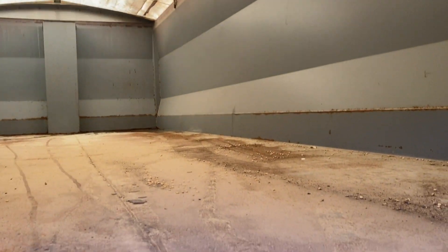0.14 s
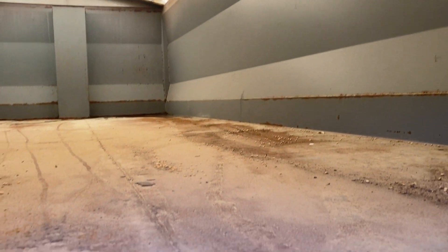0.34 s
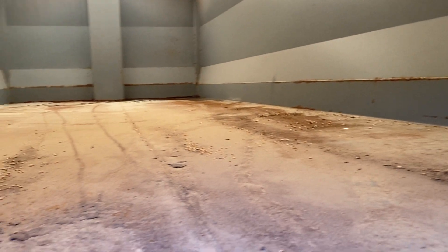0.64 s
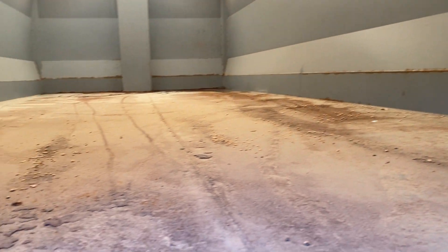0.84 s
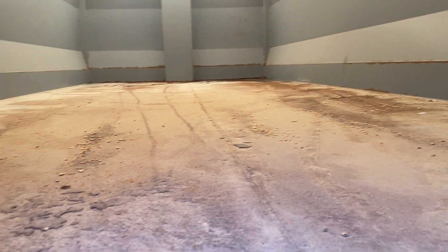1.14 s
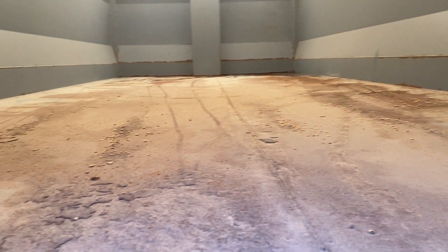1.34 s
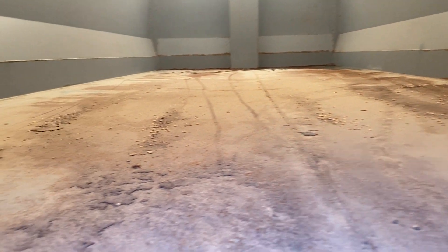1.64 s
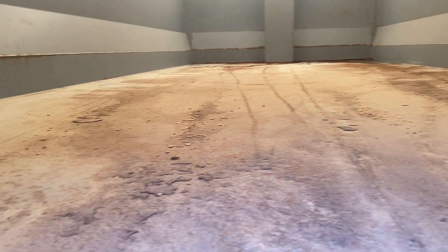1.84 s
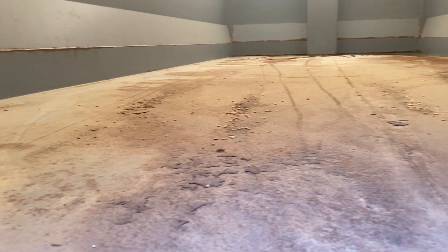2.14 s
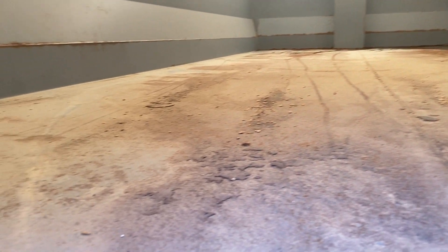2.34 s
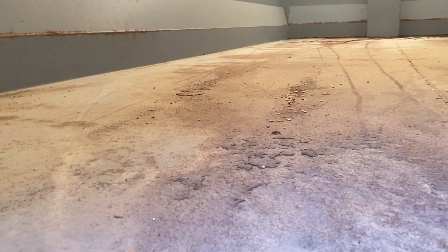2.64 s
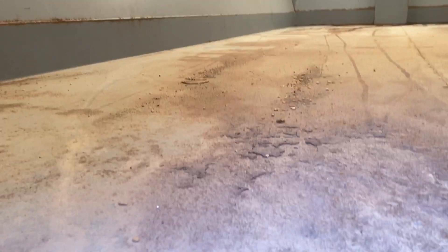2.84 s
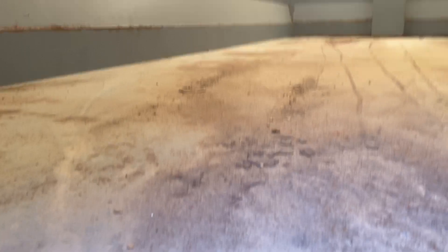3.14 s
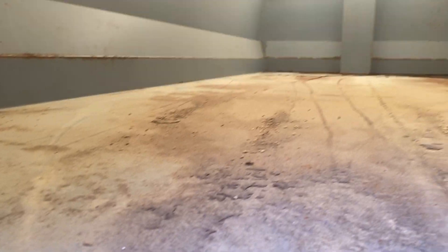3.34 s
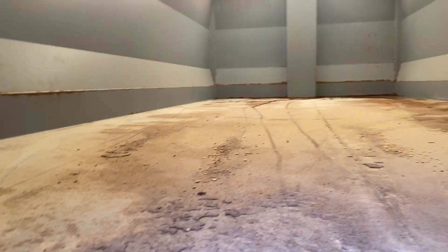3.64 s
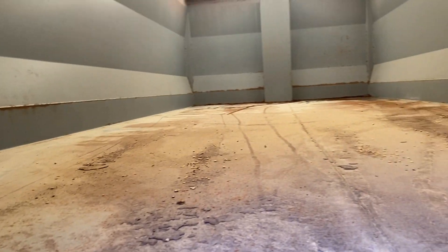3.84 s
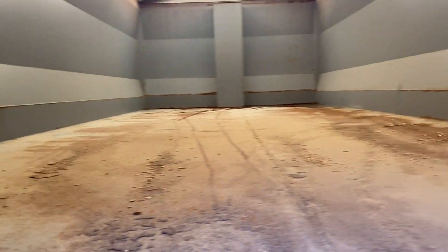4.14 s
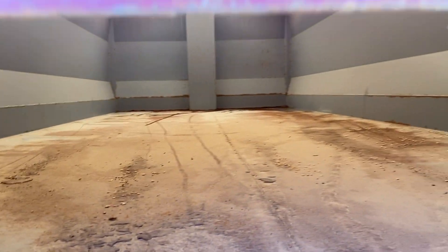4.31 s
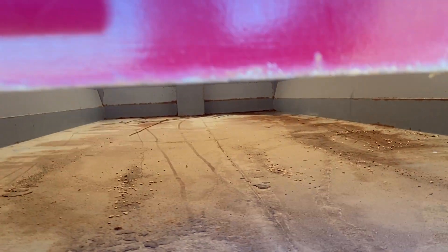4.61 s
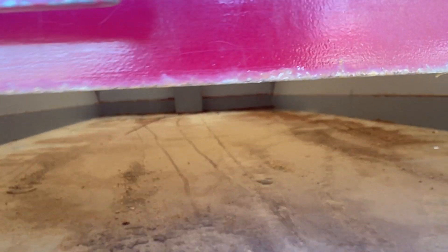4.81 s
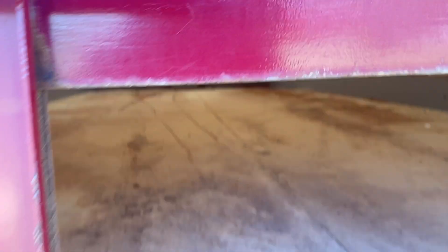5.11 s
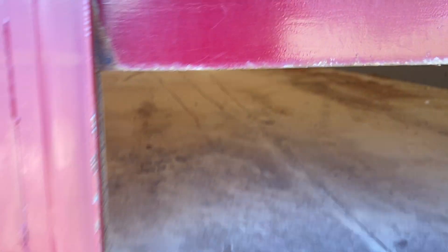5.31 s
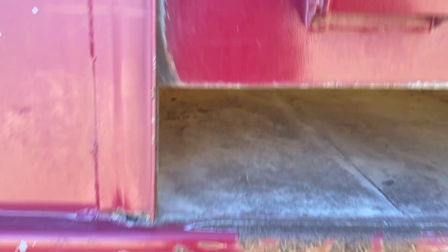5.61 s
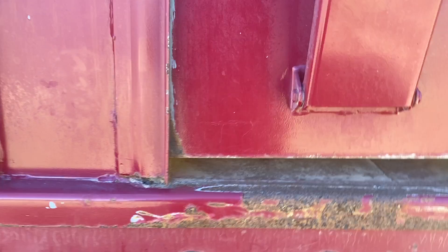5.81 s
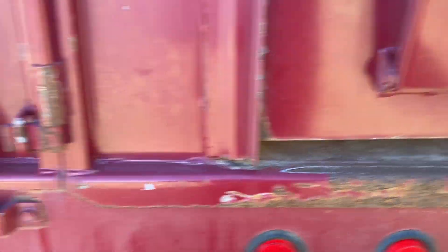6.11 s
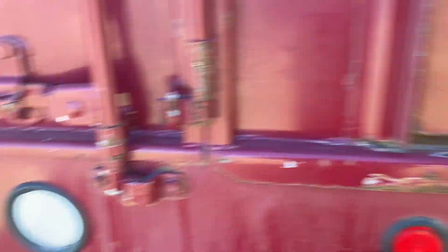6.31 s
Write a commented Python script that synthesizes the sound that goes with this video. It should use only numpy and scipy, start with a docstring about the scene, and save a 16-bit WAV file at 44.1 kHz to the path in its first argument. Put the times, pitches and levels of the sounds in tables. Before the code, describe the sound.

A large diesel truck idles from start to finish, about six and a half seconds, heard at the open rear door of its empty steel trailer. The sound is a deep, throbbing hum with a hollow exhaust boom and light engine clatter. Its humming tones swell and dip as the listener moves. Loose panels knock faintly at about 2 seconds, several times between 3 and 4, and again at 5.3. At about 5 seconds a tiny click opens a soft, steady hiss of air, and the boom eases as the listener steps back. Around 5.8 seconds the air flares into one sharp, loud, roaring burst with crisp clicks, then shuts off and rings briefly in the trailer. A second, shorter hiss with a click comes at about 6.4 seconds, over the continuing idle.

```python
"""A deep, throbbing hum comes first: a six-cylinder diesel truck idles, heard at the open rear door
of its empty steel tipper trailer. The exhaust makes the trailer boom, the engine clatters, belt-driven
parts hum and loose panels knock. The listener moves through loud and quiet spots, then steps back.
Near the end an air jet opens with a click, sweeps onto a steel corner in one sharp burst,
rings out in the trailer and opens again."""
import sys
import numpy as np
from scipy import signal
from scipy.fft import rfft, irfft, next_fast_len
from scipy.io import wavfile
from scipy.ndimage import uniform_filter1d, minimum_filter1d, map_coordinates

SR = 44100
rng = np.random.default_rng(int(sys.argv[2]) if len(sys.argv) > 2 else 0)


def pcm_store(signal):
    """Save signal as 16-bit PCM."""
    levels = np.round(np.clip(np.atleast_2d(signal), -1, 1) * 32767)
    wavfile.write(sys.argv[1], SR, levels.astype(np.int16).T)


N = 284886
TIME = np.arange(N) / SR
OPPOSITE = np.array([[1], [-1]])  # plus on the left, minus on the right


def amp(db):
    """Turn decibels into a gain to multiply by."""
    return 10 ** (np.asarray(db) / 20)


def unit(x):
    """Scale x to an average power of 1."""
    return x / np.sqrt(np.mean(x ** 2) + 1e-20)


def along(points, hz):
    """Read a (frequency, value) table, giving each octave equal room."""
    f, values = np.transpose(points)
    return np.interp(np.log(hz + 1), np.log(f + 1), values)


def over_time(points):
    """Read a (time, value) table at every sample."""
    return np.interp(TIME, *np.transpose(points))


def wobble(rate):
    """A smooth curve through `rate` random values a second."""
    grid = np.arange(0, N * rate / SR + 1, 1 / 10)
    smooth = map_coordinates(rng.standard_normal(int(N * rate / SR) + 4), [grid])
    return np.interp(TIME * rate, grid, smooth)


def filtered(x, response):
    """Multiply each frequency in x by response(hz)."""
    size = next_fast_len(N + SR // 8, real=True)
    return irfft(rfft(x, size) * response(np.fft.rfftfreq(size, 1 / SR)), size)[..., :N]


def coloured(x, spectrum):
    """Shape x with a (frequency, level) table, then scale it to power 1."""
    return unit(filtered(x, lambda hz: amp(along(spectrum, hz))))


def stereo_noise(likeness):
    """White noise that is partly the same in both ears."""
    def split(hz):
        angle = np.arccos(np.clip(along(likeness, hz), -1, 1)) / 2
        return np.array([np.cos(angle), np.sin(angle)])
    mid, side = filtered(rng.standard_normal((2, N)), split)
    return np.array([mid + side, mid - side])


def step(at_s, ease_s):
    """A smooth rise from 0 to 1 around a given time."""
    return .5 + .5 * np.tanh((TIME - at_s) / ease_s / 2)


def heard(db, fade_db_per_s, outside_loss_db):
    """Gain of an engine sound as the listener draws back slowly, then leaves the doorway."""
    return amp(db - fade_db_per_s * TIME - outside_loss_db * step(at_s=5.22, ease_s=0.14))


# Loud and quiet spots on the listener's path: sound, from t/s, to t/s, added level/dB
LISTENER_SPOTS = [("fan", 0.49, 1.51, 8.44), ("fan", 4.52, 4.94, -10.5), ("pump", 0.47, .72, 3.5),
                  ("pump", 0.97, 2.05, -5), ("pump", 1.25, 1.75, -8.5), ("pump", 2.37, 2.57, -16),
                  ("pump", 2.63, 2.97, 4.5), ("pump", 3.1, 3.42, -4), ("pump", 4.4, 4.72, 3),
                  ("pump", 5.4, 5.97, -13.5), ("drone", 0.98, 2.8, 2.2), ("drone", 2.75, 2.95, -11.5),
                  ("drone", 4.15, 4.55, -4.5), ("drone", 4.65, 5.08, 3.7), ("drone", 5.52, 5.8, 10),
                  ("pump octave", .17, 0.38, -7.5), ("pump octave", 2.1, 3.05, 4.2),
                  ("pump octave", 4.46, 5.15, 3.2), ("pump octave", 7, 6.5, -6),
                  ("pump third", 1.7, 2.2, -9.5), ("pump third", 2.35, 4.3, 5),
                  ("pump third", 4.55, 4.7, -9), ("boom", -.2, .15, 5), ("boom", 4.6, 5.3, -3.5),
                  ("boom", 5.4, 5.85, 3), ("covers", -.2, .5, 1.8), ("covers", 2, 2.35, 1.5),
                  ("covers", 3.25, 3.65, 3.1), ("block", 3.35, 4, 1.6), ("block", 4.6, 5.2, -3)]
def standing_wave(sound):
    """Echoes add up in some spots and cancel in others, so the gain changes as the listener moves."""
    spots_db = sum(db * (step(start, ease_s=.032) - step(end, ease_s=.032))
                   for name, start, end, db in LISTENER_SPOTS if name == sound)
    return amp(spots_db + 0.57 * wobble(4))


# Knocks of the shaking panels: t/s, relative level/dB, f/Hz
PANEL_KNOCKS = [(1.924, -20.5, 546), (3.180, -19.5, 535), (3.801, -20, 475), (3.910, -19, 541),
                (4.059, -20.5, 600), (5.290, -19.5, 600)]
def knocks():
    """A loose panel is bumped softly and rings with three short, low notes."""
    out, t = np.zeros(N + SR), np.arange(SR // 4) / SR
    attack_s, ring_s = 0.0014, 0.063
    for s, db, hz in PANEL_KNOCKS:
        ring = sum(amp(level) * np.sin(2 * np.pi * (hz * ratio * t + rng.random()))
                   for ratio, level in [(1, 0.5), (1.17, -5.5), (1.6, -9)])
        envelope = amp(db - 2.5 - 60 * t / ring_s) * (1 - np.exp(-t / attack_s))
        out[round(s * SR):][:len(t)] += envelope * ring
    return out[:N]


# Engine noise in the two ears: f/Hz, likeness (1 = the same)
ENGINE_LIKENESS = [(35, 0.94), (50, .8), (75, 0.27), (130, .7), (290, 0.91), (640, 0.64), (1410, 0.31),
                   (3100, 1), (7000, 0.6)]
def engine_noise(turns, share):
    """Noise of which a share repeats every two turns, as an engine's cycle does."""
    cycle = rng.standard_normal(round(2 * N / turns[-1]))
    repeating = map_coordinates(cycle, [turns / 2 % 1 * len(cycle)], mode="grid-wrap")
    return np.sqrt(share) * repeating + np.sqrt(1 - share) * stereo_noise(ENGINE_LIKENESS)


# Tone colour of the exhaust and of the booming trailer: f/Hz, relative level/dB
RUMBLE_COLOUR = [(20, -34.5), (32, -27), (54, -6.5), (64, -9), (76, -4.5), (92, -0.5), (104, -8),
                 (125, -7.5), (150, -35), (250, -81.5)]
BOOM_COLOUR = [(80, -58), (120, -16), (142, -6.5), (172, -6.5), (182, -13.5), (198, -1.5), (215, -3),
               (245, -13), (262, -11), (280, -11.5), (320, -19), (400, -46.5), (700, -91)]
def exhaust(turns):
    """Rough exhaust flow rumbles and makes the empty trailer boom."""
    rumble = coloured(engine_noise(turns, share=.4), RUMBLE_COLOUR)
    rumble *= heard(db=-29, fade_db_per_s=0, outside_loss_db=3)
    boom = coloured(engine_noise(turns, share=0.45), BOOM_COLOUR)
    boom *= heard(db=-20.5, fade_db_per_s=0.47, outside_loss_db=5.5)
    return rumble + standing_wave("boom") * boom


FIRINGS_PER_TURN = 3
# Tone colour of the engine block: f/Hz, relative level/dB
BLOCK_COLOUR = [(200, -31), (320, 0), (400, -1), (475, .5), (600, -8.5), (900, -10), (1200, -17.5),
                (1900, -25), (2700, -31), (4000, -37), (5300, -42.5), (6500, -50), (8000, -53.5),
                (15000, -72.5)]
# A ringing note of the engine and a very faint, thin, high whine: f/Hz, width/Hz, relative level/dB
RING_AND_WHINE = [(2233, 135, 2), (11870, 350, -31)]
def clatter(turns):
    """The noise of burning fuel swells with each firing, and the engine rings much alike each time."""
    firing = amp(.5 * np.cos(2 * np.pi * FIRINGS_PER_TURN * turns) + 0.53 * wobble(28))
    block = coloured(engine_noise(turns, share=.2) * firing, BLOCK_COLOUR)
    bass = filtered(block, lambda hz: 1 / (1 + (hz / 600) ** 2) ** 2)
    block += (standing_wave("block") - 1) * unit(bass)  # the spots act below about 600 Hz
    block *= heard(db=-26.5, fade_db_per_s=1.44, outside_loss_db=-0.8)

    def ring(hz):
        return sum(amp(db) * (1j * hz * width / (note ** 2 - hz ** 2 + 1j * hz * width)) ** 2
                   for note, width, db in RING_AND_WHINE)
    strikes = engine_noise(2 * FIRINGS_PER_TURN * turns, share=0.5) * firing
    ringing = unit(filtered(strikes, ring)) * standing_wave("covers")
    return block + ringing * heard(db=-47.5, fade_db_per_s=1.26, outside_loss_db=4)


def tone(turns, per_turn, flutter_db, spread_rad):
    """A slightly unsteady tone that follows the engine's speed, a little out of step between the ears."""
    phase = 2 * np.pi * ((per_turn * turns + rng.random()) % 1)
    drift = spread_rad * wobble(0.75) * OPPOSITE
    return unit(amp(flutter_db * wobble(12)) * np.sin(phase + drift))


# Tones of the firing cylinders and of the belt: waves per turn, relative level/dB
FIRING_TONES = [(3, -32.5), (3.5, -41), (4.5, -40.5), (5, -33.5), (6, -29.5), (9, -35.5), (15, -38),
                (16, -34.5)]
BELT_TONES = [(13.1, -37.5), (13.75, -35), (15.17, -31), (15.7, -37.5), (18.8, -34), (27, -47.5),
              (28.9, -44)]
# Rise and fall of the firing tones: t/s, added level/dB
THROB_SWELL = [(0, 5.5), (1, 4), (2, 3), (2.75, -1), (3.2, 4), (4.2, -2), (4.9, -0.5), (5.8, 0),
               (6.46, -1.5)]
# The strong hums: name, level/dB, fade/(dB per s), loss outside the door/dB
STRONG_HUMS = [("drone", -18, 1.15, 8), ("drone octave", -38, .7, -9), ("pump", -19, 0, 6.5),
               ("pump octave", -20.5, 0.3, 14), ("pump third", -33, 0.34, 12), ("fan", -20, 0.98, -0.4)]
def hums(turns):
    """Firing cylinders throb and belt-driven parts hum, all tied to the engine's turning shaft."""
    throb = sum(amp(db) * tone(turns, per_turn, flutter_db=0.7, spread_rad=.07)
                for per_turn, db in FIRING_TONES)
    throb *= amp(over_time(THROB_SWELL))
    belt = sum(amp(db) * tone(turns, per_turn, flutter_db=3.5, spread_rad=.2)
               for per_turn, db in BELT_TONES)
    belt *= heard(db=2.5, fade_db_per_s=1.1, outside_loss_db=7)
    drone, pump, fan = 12, 7.225, 17.375  # waves per turn
    per_turn = {"drone": drone, "drone octave": 2 * drone, "fan": fan,
                "pump": pump, "pump octave": 2 * pump, "pump third": 3 * pump}
    strong = 0
    for name, db, fade, loss in STRONG_HUMS:
        gain = heard(db, fade, loss) * standing_wave(name)
        strong += gain * tone(turns, per_turn[name], flutter_db=0.73, spread_rad=0.1)
    return throb + strong + belt


# Ticks of the air valve and of grit: t/s, level/dB, f/Hz, time to fade 60 dB/s, purity of the note (Q)
VALVE_AND_GRIT = [(4.011, -42, 4400, 0.006, 1.2), (4.913, -45, 7250, 0.07, 8), (5.339, -35, 3600, 0.038, 1),
                  (5.759, -14, 4010, .03, 1), (5.764, -5.5, 9500, .0045, 1), (5.767, -12, 6030, 0.011, 1),
                  (5.800, -17.5, 3430, .008, 1), (6.213, -50.5, 9950, 0.14, 1.1),
                  (6.425, -26, 6930, 0.042, 1)]
def ticks():
    """Each tick is a short crack of noise that rings around one pitch."""
    out, t = np.zeros((2, N + SR)), np.arange(SR // 4) / SR
    for s, db, hz, ring_s, purity in VALVE_AND_GRIT:
        b, a = signal.iirpeak(hz, purity, SR)
        ring = lambda x: signal.lfilter(b, a, signal.lfilter(b, a, x))
        noise = rng.standard_normal(len(t)) + 0.45 * rng.standard_normal((2, len(t)))
        crack = amp(db - 60 * t / ring_s) * noise
        out[:, round(s * SR):][:, :len(t)] += ring(crack) / ring(noise).std()
    return out[:, :N]


# How long the trailer rings: f/Hz, time to fade 60 dB/s
RING_TIMES = [(200, 9), (2000, 3), (5000, 1.5), (8000, 1.7), (15000, 1.8)]
# Tone colour of its echo: f/Hz, relative level/dB
ECHO_COLOUR = [(200, -9), (1000, -1), (3000, -1), (5500, 2.5), (8000, -11.5), (15000, -9)]
def trailer_echo(x):
    """The long steel box rings on; high notes die sooner than low ones."""
    noise = rng.standard_normal((2, SR)) + rng.standard_normal(SR)
    hz, t, bands = signal.stft(noise, SR, nperseg=256)
    fade = amp(along(ECHO_COLOUR, hz)[:, None] - 60 * t / along(RING_TIMES, hz)[:, None])
    _, tail = signal.istft(bands * fade, SR, nperseg=256)
    return signal.fftconvolve(x, tail / np.linalg.norm(tail[0]), axes=1)[:, :N]


def walls(x, longest_s, strength, count):
    """Weak, quick echoes off nearby steel lift some frequencies and lower others."""
    delays = rng.uniform(longest_s / 10, longest_s, count)
    ripple = lambda hz: 1 + strength * sum(np.exp(-2j * np.pi * hz * delay) for delay in delays)
    return filtered(x, ripple) / np.sqrt(1 + count * strength ** 2)


# Blasts of air: fully open t/s, closing t/s, hiss level/dB, sag/(dB per s), roar above hiss/dB
AIR_BLASTS = [(4.976, 5.802, -38, 7.7, -2.8), (6.359, 6.426, -29.5, 54.5, -3.5)]
# The jet spits and its roar jumps: t/s, added level/dB
JET_SPITS = [(5.337, 9.5), (5.759, 8.5)]
def jet_gains():
    """The valve opens, the pressure sags, the valve shuts; sweeping onto the corner lifts the level."""
    open_db_per_s, close_db_per_s, spit_s = 748, 224.5, 0.039
    hiss = roar = 0
    for opened, closing, db, sag, roar_db in AIR_BLASTS:
        opening_db = open_db_per_s * np.maximum(opened - TIME, 0)
        sag_db = sag * np.maximum(TIME - opened, 0)
        closing_db = close_db_per_s * np.maximum(TIME - closing, 0)
        flow = amp(db - opening_db - sag_db - closing_db)
        hiss += flow
        roar += amp(roar_db) * flow
    arrives_s, leaves_s, sweep_db, sweep_db_per_s = 5.716, 5.795, 28.5, 158
    off_corner_s = np.abs(TIME - np.clip(TIME, arrives_s, leaves_s))
    sweep = np.hypot(1, amp(sweep_db - sweep_db_per_s * off_corner_s))
    spits = amp(sum(db * (TIME > s) * np.exp(-np.abs(TIME - s) / spit_s) for s, db in JET_SPITS))
    return hiss * sweep ** 0.29, roar * sweep * spits  # the hiss rises far less than the roar


def peaks(rows):
    """A filter response with a rounded peak or dip for each row."""
    return lambda hz: amp(sum(db * np.exp(-((hz - centre) / width) ** 2) for centre, width, db in rows))


# Air noise in the two ears: f/Hz, likeness (1 = the same)
AIR_LIKENESS = [(300, 1), (1300, 0.53), (2500, 1), (4500, 0.85), (7000, .7), (8500, 0.99), (12000, 0.69),
                (15000, 0.69)]
# Tone colour of the nozzle's hiss and of the jet's roar: f/Hz, relative level/dB
HISS_COLOUR = [(300, -35), (1000, 10.5), (2200, -1), (3500, 0), (5500, -4), (7000, -1), (8300, -1.5),
               (10000, -3), (12000, -9), (14500, -5), (15700, -4.5)]
ROAR_COLOUR = [(120, -31.5), (350, 3), (480, 4), (640, 5.5), (900, 1.5), (1500, 1.5), (2150, 0),
               (2700, -2.5), (3500, -5), (5000, -9.5), (7500, -13), (10200, -13), (12000, -24),
               (15500, -23)]
# Peaks and dips that colour the hiss and the roaring burst of air: f/Hz, width/Hz, added level/dB
HISS_PEAKS = [(3370, 99, 4.5), (3740, 50, 3), (4030, 70, 3.5), (6860, 120, 5.5), (9500, 250, 2)]
BURST_PEAKS = [(351, 20, 7.5), (725, 49, -0.5), (2100, 380, 3.5), (2300, 48, -2), (2900, 25, 1),
               (2980, 53, 3.5), (3370, 280, 4), (3630, 120, 4), (3780, 63, -4.5), (4900, 120, 3),
               (6850, 160, 1.5), (9970, 150, 2)]
def air_jet():
    """The nozzle hisses with a faint whistle, the jet roars, and both echo down the trailer."""
    hiss_gain, roar_gain = jet_gains()
    hiss = hiss_gain * amp(.7 * wobble(40)) * coloured(stereo_noise(AIR_LIKENESS), HISS_COLOUR)
    roar = roar_gain * amp(1.9 * wobble(420)) * coloured(stereo_noise(AIR_LIKENESS), ROAR_COLOUR)
    near = filtered(hiss, peaks(HISS_PEAKS)) + filtered(roar, peaks(BURST_PEAKS))
    return walls(near, longest_s=.016, strength=0.12, count=8) + amp(-17) * trailer_echo(hiss + roar)


# Speed of the engine's shaft: t/s, speed/(turns per minute)
ENGINE_SPEED = [(0.0, 790.7), (0.4, 795.6), (0.8, 799), (1.2, 798.7), (1.6, 795.4), (2.0, 786.8),
                (2.4, 785.5), (2.8, 776.6), (3.2, 770.7), (3.6, 763.6), (4.0, 766.2), (4.4, 775.8),
                (4.8, 786.2), (5.2, 784), (5.6, 792.6), (6.0, 797.1), (6.46, 797.2)]
# How much louder the left side is than the right: f/Hz, level/dB
LEFT_LEAN = [(100, 0.5), (380, -1.1), (700, -1.5), (1290, -1.5), (2380, 2), (4400, 2.5), (8120, -0.3),
             (15000, -0.5)]
def scene():
    """The truck idles throughout; the air jet joins it near the end."""
    turns = np.cumsum(over_time(ENGINE_SPEED)) / SR / 60
    truck = hums(turns) + exhaust(turns) + clatter(turns) + knocks()
    mix = truck + air_jet() + ticks()
    return filtered(mix, lambda hz: amp(along(LEFT_LEAN, hz) * OPPOSITE / 2))


def limiter(x, ceiling, hold_s):
    """The volume drops just before a peak, holds, and creeps back."""
    needed = np.minimum(1, ceiling / (np.abs(x).max(axis=0) + 1e-9))
    ahead, span = SR // 500, int(hold_s * SR) | 1  # in samples; span is odd
    early = minimum_filter1d(needed, 2 * ahead + 1)
    held = minimum_filter1d(early, span, origin=span // 2)
    gain = np.minimum(held, uniform_filter1d(held, span, origin=span // 2))
    return x * uniform_filter1d(gain, ahead)


# How far the wave at the left sound inlet runs ahead of the right: f/Hz, phase/radians
LEFT_LEAD = [(200, 0.3152), (500, -0.25), (1000, 0.74), (1900, -1.35), (2900, 1.04), (5000, 0.54),
             (6600, 0.5), (8000, -2), (8520, -3.5), (9700, -6), (10300, -5.5), (11700, -10.5), (12350, -10),
             (13700, -15), (14400, -13.5), (15700, -13)]
def record(dry):
    """Two inlets put the treble out of step; a limiter catches the burst; the highest treble is cut."""
    fade_in = np.minimum(1, np.arange(N) / 300)
    shifted = filtered(dry * fade_in, lambda hz: np.exp(.5j * along(LEFT_LEAD, hz) * OPPOSITE))
    return filtered(limiter(shifted, ceiling=0.98, hold_s=0.12), lambda hz: hz < 15750)


dry = scene()
out = record(dry)
pcm_store(out)
```